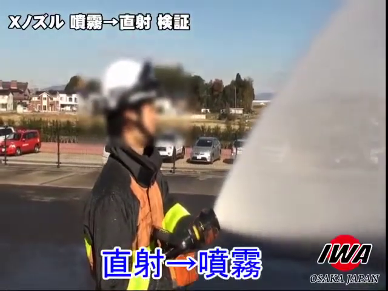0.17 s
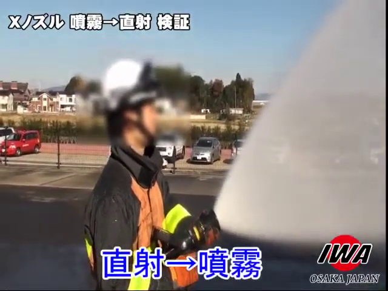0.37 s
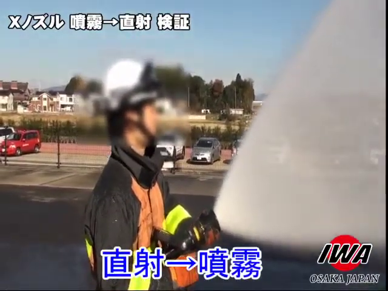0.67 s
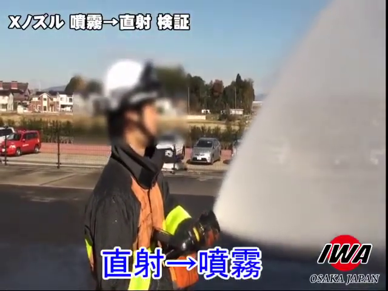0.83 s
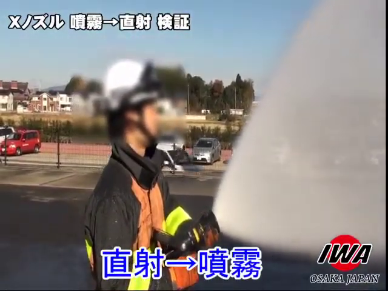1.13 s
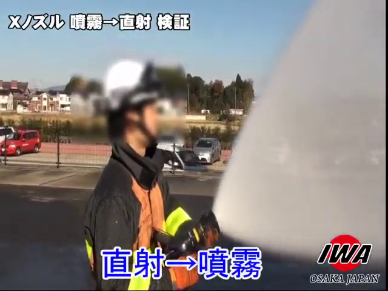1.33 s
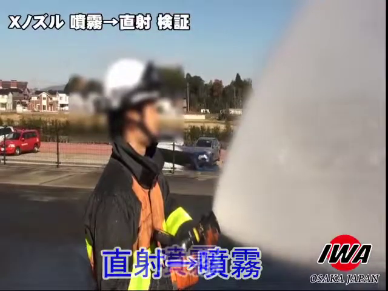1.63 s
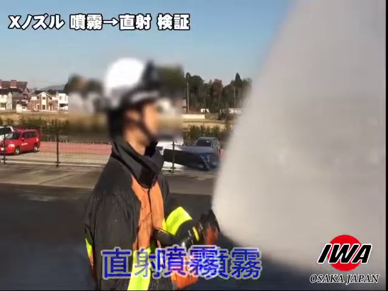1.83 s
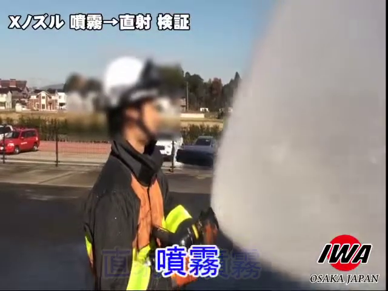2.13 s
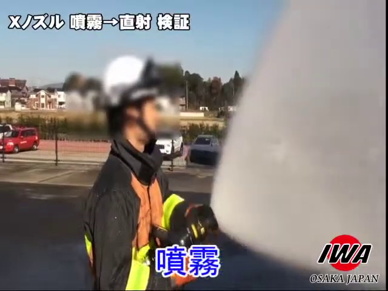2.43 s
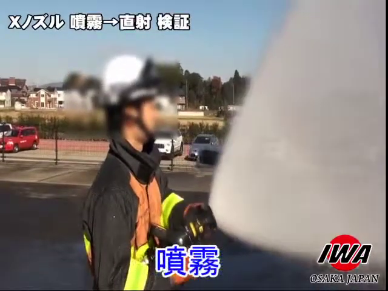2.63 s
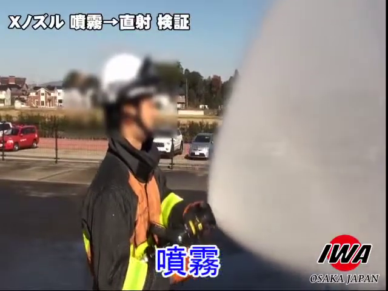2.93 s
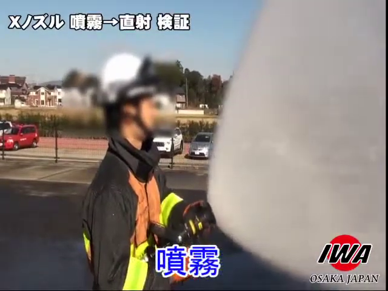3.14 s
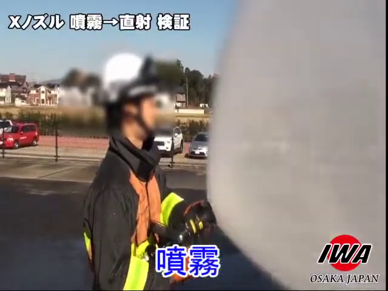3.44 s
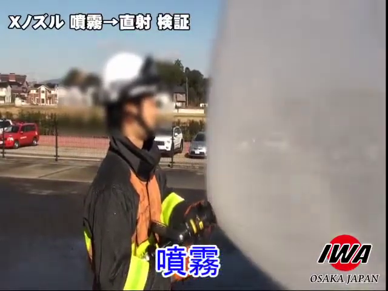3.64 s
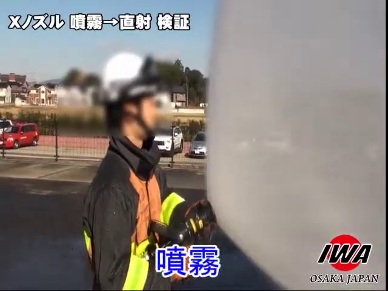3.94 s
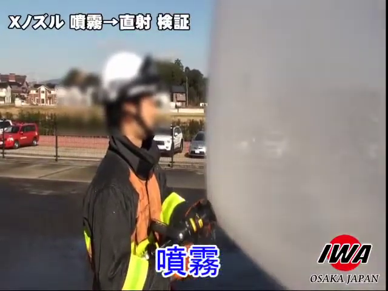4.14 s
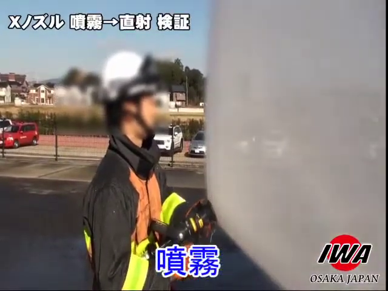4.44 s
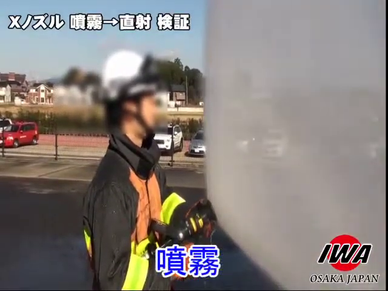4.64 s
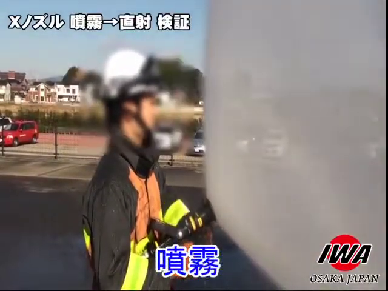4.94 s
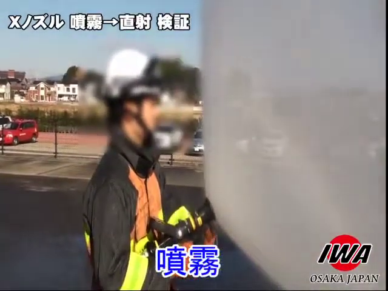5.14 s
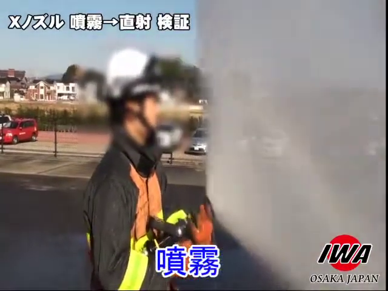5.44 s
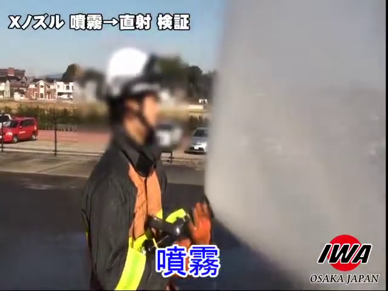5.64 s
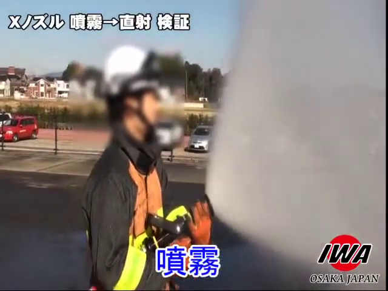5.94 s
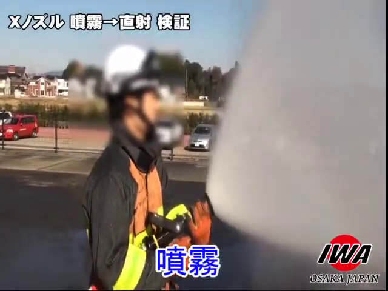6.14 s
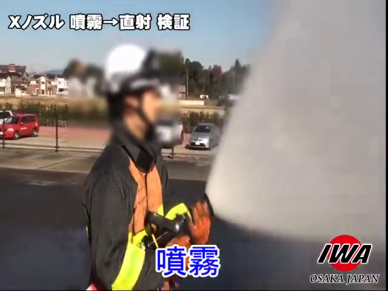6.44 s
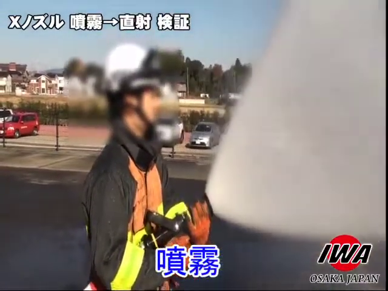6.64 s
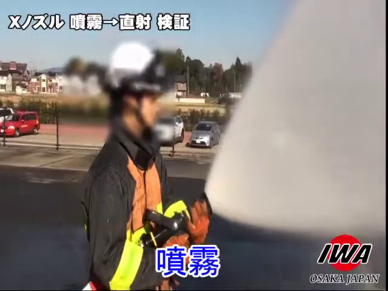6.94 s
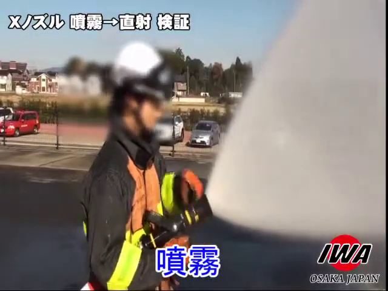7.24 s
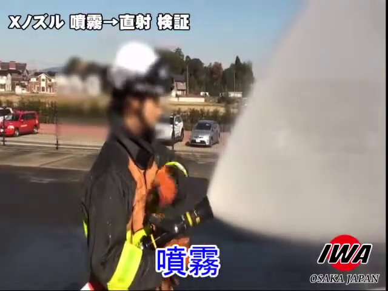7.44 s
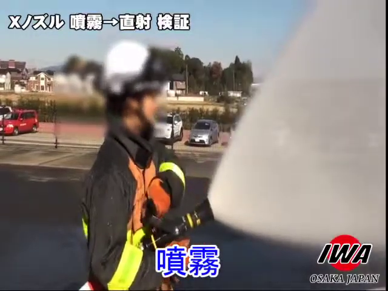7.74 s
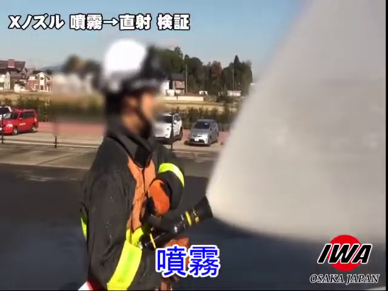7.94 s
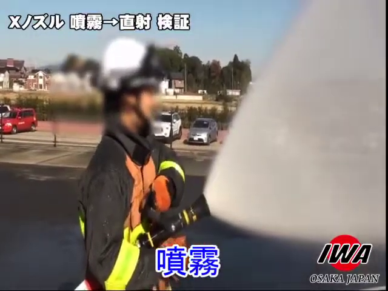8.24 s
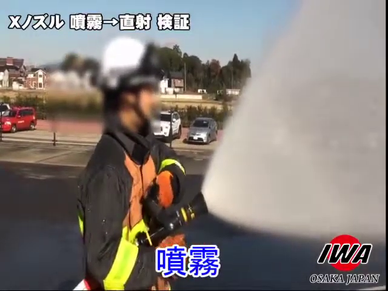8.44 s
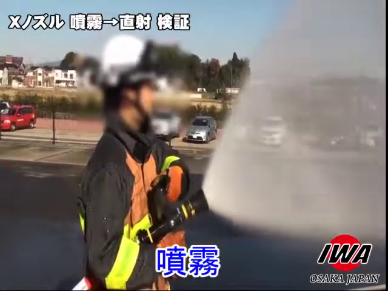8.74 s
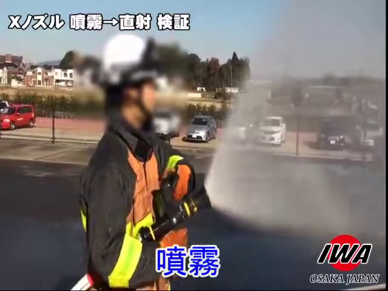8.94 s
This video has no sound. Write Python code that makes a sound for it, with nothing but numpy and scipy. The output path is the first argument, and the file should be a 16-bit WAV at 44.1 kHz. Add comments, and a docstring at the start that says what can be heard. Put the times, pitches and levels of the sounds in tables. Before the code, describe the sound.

Water rushes from a hose nozzle in a wide, hissing spray that gradually swells, with a pump droning far away.

```python
"""On open asphalt, a fire hose nozzle throws a wide cone of spray; the rush swells as the cone is opened.
Drops break up, fine mist hisses, hose and wet ground roar, and a far pump drones underneath.
The dull rush below 3 kHz repeats as mirrored bands of hiss around 8 and 16 kHz.
A thin, fluttering whine and a few brief clicks sit among that high hiss."""
import sys
import numpy as np
from scipy import signal
from scipy.fft import rfft, irfft, next_fast_len
from scipy.io import wavfile
from scipy.ndimage import uniform_filter1d, map_coordinates

SR = 44100
rng = np.random.default_rng(int(sys.argv[2]) if len(sys.argv) > 2 else 0)


def persist_wave(psi):
    """Save psi, clipped to +-1, as 16-bit WAV."""
    counts = np.round(np.clip(psi, -1, 1) * 32767).astype(np.int16)
    wavfile.write(sys.argv[1], SR, np.atleast_2d(counts).T)


N = 400869

# How loud the spray is as the cone is turned. Each row: time in seconds, level in dB.
SPRAY_LEVELS = [(0, -38.5), (.4, -37), (1, -36.5), (1.5, -34.5), (2.2, -35), (3.5, -31.5), (4.5, -30.5),
                (5.2, -29), (7.3, -29), (7.45, -26.5), (8.4, -27), (8.65, -28.5), (9.09, -28)]
# The tone of drops breaking up. Each row: frequency in Hz, relative level in dB.
SPRAY_TONE = [(180, -40.5), (300, -7), (445, -5.5), (600, -4), (800, -3.5), (1000, -3), (1120, -1),
              (1215, -0.5), (1250, -3.5), (1500, -7), (1700, -7.5), (1860, -9.5), (1900, -24), (2500, -120)]
# The tone of the finest drops. Each row: frequency in Hz, relative level in dB.
MIST_TONE = [(1500, -120), (1840, -24.5), (1890, -0.5), (2010, -1), (2150, -7.5), (2300, -12.5),
             (2520, -15), (2780, -11.5), (2930, -17), (3020, -16), (3300, -120)]
# The tone of pump, hose and water on the ground. Each row: frequency in Hz, relative level in dB.
ROAR_TONE = [(8.8, -31.5), (15, 1), (37, 0), (69, -5.5), (119, -3), (242, -5), (287, -10), (321, -4.5),
             (457, -10.5), (616, -18), (689, -12.5), (756, -19), (929, -12.5), (1300, -19.5), (1690, -47.5),
             (2860, -120)]
# The slow drift of the roar. Each row: time in seconds, level in dB.
ROAR_LEVELS = [(0, -33.5), (2.2, -31), (3.8, -32.5), (6, -31), (7.5, -32), (8.4, -34.5), (9.09, -32)]
# The pump's filter, applied twice. Each row: a band's centre in Hz, width in Hz, gain in dB.
PUMP_BANDS = [(32.2, 13, -0.5), (100.6, 14, -1), (130.3, 14, -0.5), (160.8, 18, -2), (249.5, 21.6, -0.5)]
# The mirrored hiss. Each row: frequency in the rush in Hz, gains in dB for the copies above 8 kHz,
# below 8 kHz and below 16 kHz, how closely they follow the rush (0-1), the echo's share (0-1).
MIRRORS = [(20, -9.5, -7.5, -15, 0.2, 0), (300, -9, -6.5, -14, 0.2, .15), (600, -8, -7.5, -15.5, .8, 0.6),
           (1130, -7, -7, -11, 1, 0.2), (1317, -2, -8, -10.5, .85, 0.3), (1550, 0.5, 2, -6, 0.9, 0.5),
           (1880, 1.5, 4, -7, 0.79, 0.22), (1907, -8, -8.5, -11.5, 1, 0.04), (2400, -7, -8.5, -8.5, 1, 0.1),
           (3030, -5.5, -5, -7, 0.5, 0.07)]
# The tone of the thin whine. Each row: distance from 8 kHz in Hz, relative level in dB.
WHINE_TONE = [(6, -23), (9, -7), (10.5, 27.5), (12, -6), (16, -13.5), (40, -23), (250, -27), (500, -69)]
# The spray sputters. Each row: time in seconds, rise in dB.
SPUTTERS = [(.14, 5), (.25, 6.5), (.732, 8.5), (.813, 8.5), (7.955, 3)]
# Brief high clicks. Each row: time in seconds, strength in dB.
CLICKS = [(.631, -19), (6.14, -24), (6.635, -23), (8.1347, -9.5)]

MIRROR_HZ, ECHO_DELAY_S = 8000, .0081
RUSH_TOP_HZ, TREBLE_TOP_HZ = 3020, 15730
ROWS = 4  # one noise for the low rush, plus one for each mirrored band
TIME = np.arange(N) / SR


def amp(db):
    """Turn decibels into a number to multiply by."""
    return 10 ** (np.asarray(db) / 20)


def unit(x):
    """Scale a signal to an average (rms) size of 1."""
    return x / np.sqrt(np.mean(x ** 2) + 1e-20)


def look_up(table, hz, column=1):
    """Read between the rows of a table that starts with Hz, on a log scale."""
    columns = np.transpose(table)
    return np.interp(np.log(hz + 1), np.log(columns[0] + 1), columns[column])


def wobble(rate):
    """A smooth curve through `rate` random points a second."""
    return map_coordinates(rng.standard_normal(int(N * rate / SR) + 4), [TIME * rate])


def bumps(rows, half_s):
    """Bell-shaped bumps. Each row: time in seconds, height."""
    return sum(height * np.exp(-.5 * ((TIME - at) / half_s) ** 2) for at, height in rows)


def filtered(x, response):
    """Multiply each frequency in x by response(hz)."""
    size = next_fast_len(N + SR // 2)
    return irfft(rfft(x, size) * response(np.fft.rfftfreq(size, 1 / SR)), size)[..., :N]


def echo(hz, share):
    """A filter that adds an 8 ms echo, which puts ripples in the tone."""
    return 1 + share * np.exp(-2j * np.pi * hz * ECHO_DELAY_S)


def rush(tone, patchy_db, count=ROWS):
    """Rows of separate noise with one tone, all sharing the same random louder and softer patches."""
    grid = signal.stft(rng.standard_normal((count, N)), nperseg=1024)[2]
    patches = uniform_filter1d(rng.standard_normal(grid.shape[1:]), size=5, axis=0)  # blur in pitch
    patches = uniform_filter1d(patches, size=4, axis=1)  # blur in time
    noise = signal.istft(grid * amp(patchy_db * unit(patches)), nperseg=1024)[1][:, :N]
    return unit(filtered(noise, lambda hz: amp(look_up(tone, hz))))


def spray(level_db):
    """The jet breaks up into drops with a broad rush."""
    return amp(level_db) * filtered(rush(SPRAY_TONE, patchy_db=.82), lambda hz: echo(hz, -.15))


def mist(spray_db, surge_db):
    """The finest drops hiss higher up, swelling and surging with the spray."""
    swell_db = 1.06 * (spray_db - spray_db.mean())
    late_lift_db = np.clip((TIME - 7.4) / .36, 0, 1)  # 1 dB extra near the end
    return amp(-40.5 + swell_db + late_lift_db + .79 * surge_db) * rush(MIST_TONE, patchy_db=.44)


def roar(dip_db):
    """Pump, hose and water on the ground make a low roar that drifts at its own pace."""
    level_db = np.interp(TIME, *np.transpose(ROAR_LEVELS))
    return amp(level_db + dip_db) * rush(ROAR_TONE, patchy_db=.6)


def water():
    """Spray and mist surge together as the jet pulses; they and the roar dip briefly once."""
    spray_db = np.interp(TIME, *np.transpose(SPRAY_LEVELS))
    dip_db = -3.5 * np.exp(-((TIME - 6.69) / .055) ** 4)
    surge_db = .27 * wobble(18) + .45 * wobble(40) + dip_db + bumps(SPUTTERS, half_s=.004)
    return spray(spray_db + surge_db) + mist(spray_db, surge_db) + roar(dip_db)


def pump():
    """The far pump drones in narrow bands of noise and slowly fades."""
    def bands(hz):
        return sum(amp(db) * 1j * hz * width / (centre ** 2 - hz ** 2 + 1j * hz * width)
                   for centre, width, db in PUMP_BANDS)
    level_db = -38 - .37 * TIME + .6 * wobble(.35)
    drone = filtered(rng.standard_normal((ROWS, N)), lambda hz: bands(hz) ** 2)
    return amp(level_db) * unit(drone)


def whine():
    """A thin, fluttering whine at 8 kHz."""
    flutter = amp(-40.5 + .6 * wobble(1.4)) * rush(WHINE_TONE, patchy_db=1.3, count=1)[0]
    return flutter * np.cos(2 * np.pi * MIRROR_HZ * TIME)


def mirrored_hiss(low_rush, other_rushes):
    """The rush repeats as bands of hiss above (+1) or below (-1) multiples of 8 kHz."""
    hiss = np.zeros(N)
    for column, multiple, side in ((1, 1, 1), (2, 1, -1), (3, 2, -1)):
        def gain(hz):
            return amp(look_up(MIRRORS, hz, column)) * echo(hz, look_up(MIRRORS, hz, column=5))

        def alike(hz):  # how closely this band follows the low rush; the highest follows least
            return look_up(MIRRORS, hz, column=4) ** (multiple ** 2)

        band = filtered(low_rush, lambda hz: gain(hz) * np.sqrt(alike(hz)))
        band += filtered(other_rushes[column - 1], lambda hz: gain(hz) * np.sqrt(1 - alike(hz)))
        one_sided = signal.hilbert(band, next_fast_len(N))[:N]  # so the shift makes just one copy
        hiss += np.real(one_sided * np.exp(2j * np.pi * side * multiple * MIRROR_HZ * TIME))
    return hiss


def clicks():
    """Brief high clicks around 8 and 16 kHz."""
    pulses = bumps([(at, amp(db)) for at, db in CLICKS], half_s=.0008)
    angle = 2 * np.pi * MIRROR_HZ * TIME
    return pulses * (np.cos(angle) + 2 * np.cos(2 * angle))


def splash(at_s=6.6565, level_db=-30):
    """Fine drops splash near the microphone: one tiny burst of hiss."""
    shape = bumps([(at_s, 1)], half_s=.0016)
    tone = [(1700, -45), (2000, 1), (2900, -5.5), (3100, -40.5)]  # each pair: Hz, relative dB
    burst = shape * rush(tone, patchy_db=1, count=1)[0]
    return amp(level_db) * burst * np.linalg.norm(shape) / np.linalg.norm(burst)


def scene():
    """The dull rush plus the high whine, hiss and clicks, in one channel."""
    low_rush, *other_rushes = filtered(water() + pump() + splash(), lambda hz: hz < RUSH_TOP_HZ)
    return (low_rush + whine() + mirrored_hiss(low_rush, other_rushes) + clicks())[None]


def record(dry):
    """Cut off the very highest treble."""
    return filtered(dry, lambda hz: hz < TREBLE_TOP_HZ)


dry = scene()
out = record(dry)
persist_wave(out)
```